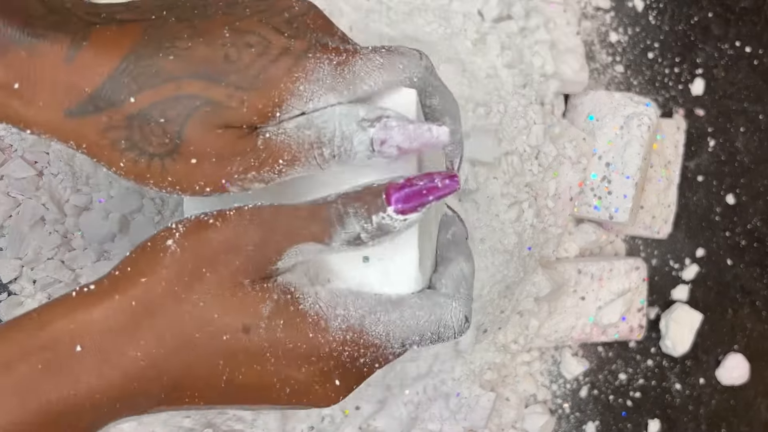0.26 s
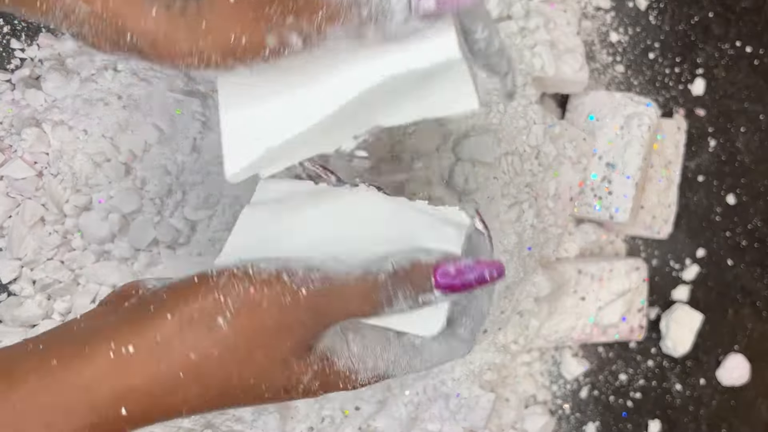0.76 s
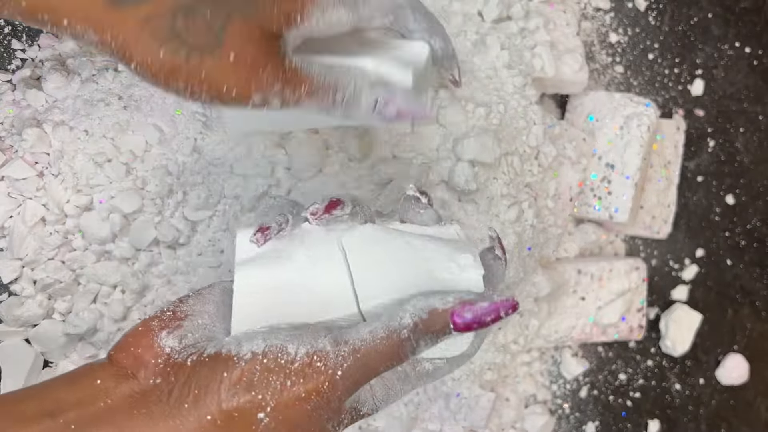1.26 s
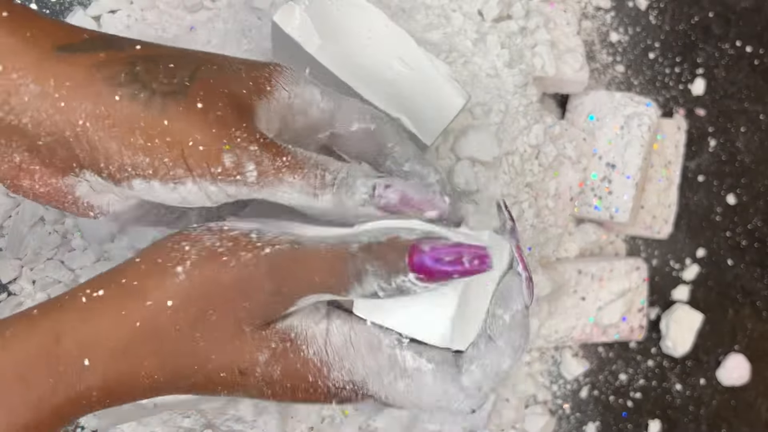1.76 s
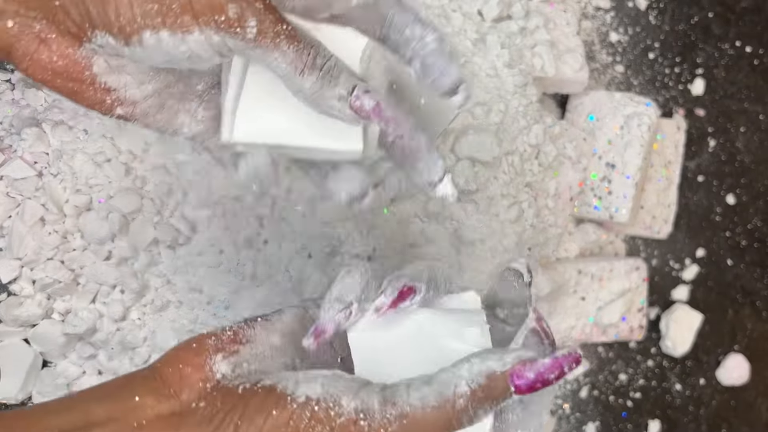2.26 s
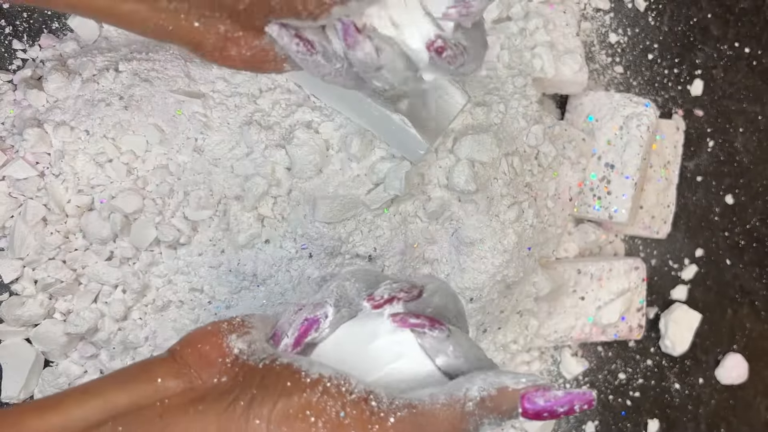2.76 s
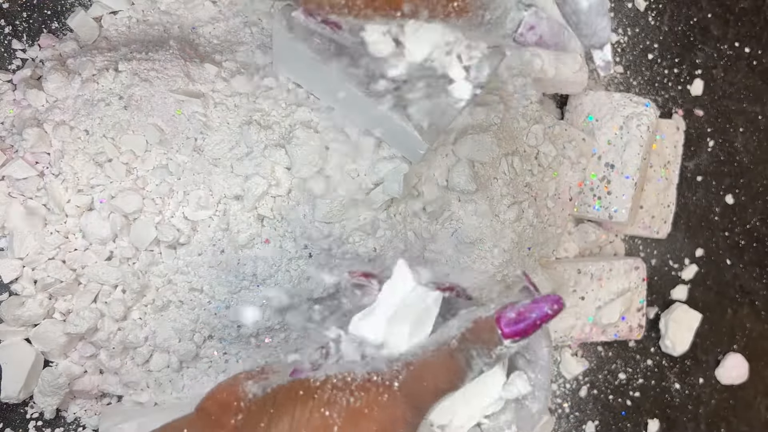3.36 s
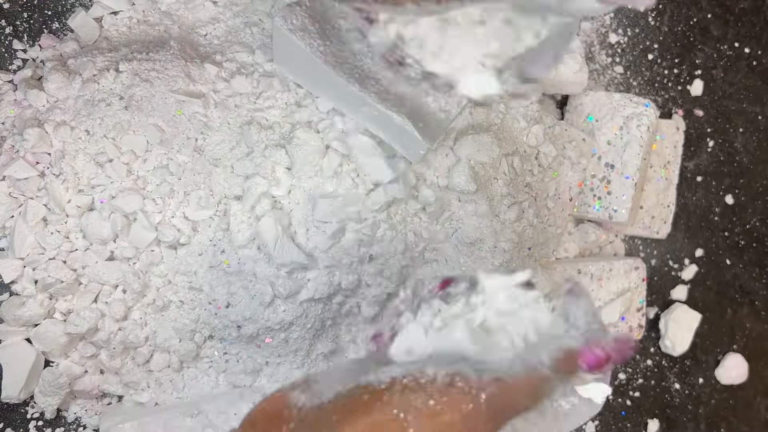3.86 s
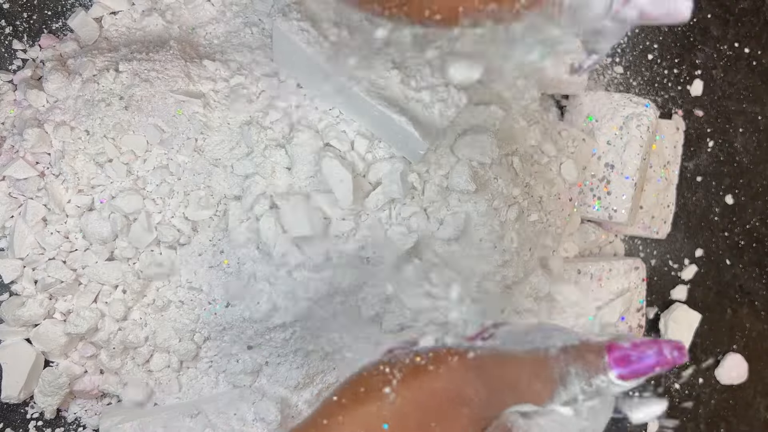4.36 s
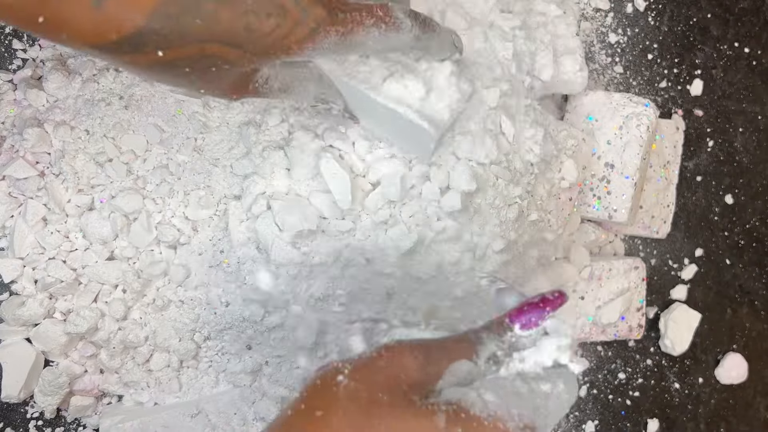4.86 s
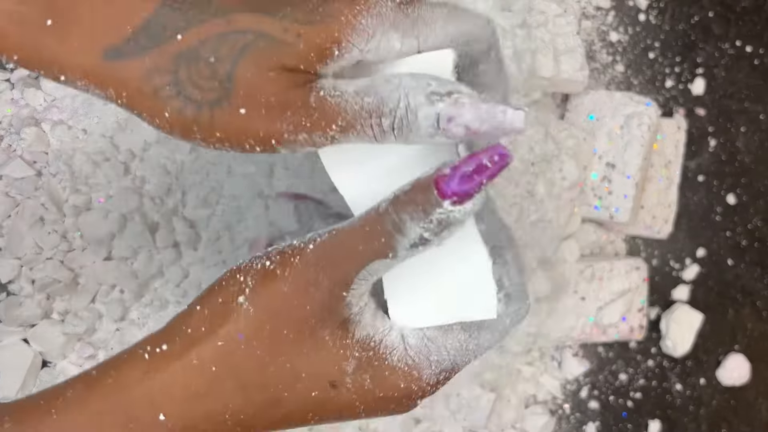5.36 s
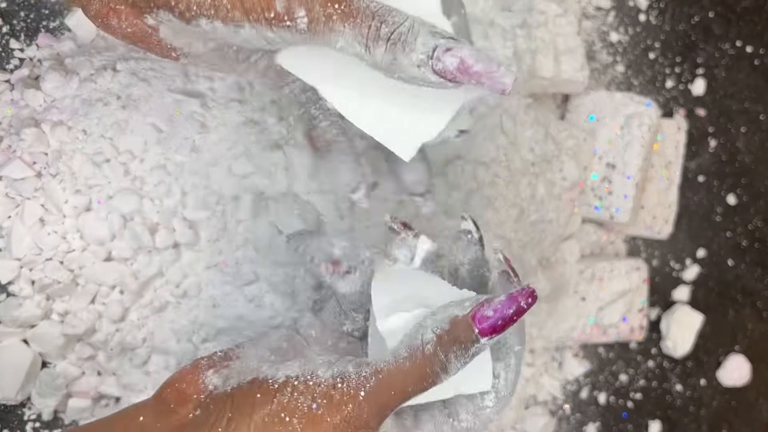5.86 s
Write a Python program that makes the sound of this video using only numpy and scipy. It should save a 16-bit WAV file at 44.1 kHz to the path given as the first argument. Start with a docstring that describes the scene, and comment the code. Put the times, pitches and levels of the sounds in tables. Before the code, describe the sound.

Brittle, dry chalk cracks and crumbles at close range, with crisp splintery ticks and powdery hiss. One hard break opens, quieter scraping follows, and heavy crushing builds halfway through before easing into irregular crackles and late snaps. The loudest breaks are slightly overloaded; a faint short room echo and a steady, dull fan hum surround them.

```python
"""Breaking dry chalk

Hands snap and crumble blocks of dry chalk at close range indoors. Each fracture is a decaying burst of noise
with a ringing splinter; the biggest add a low sliding push. Between them many tiny breaks gate a hiss of
crumbs, lumps and powder. A small room answers as decaying noise, a ventilation unit adds wavering tones and a
dull rush, and the loudest cracks are rounded off at full scale."""
import sys
import numpy as np
from scipy import signal
from scipy.fft import rfft, irfft, next_fast_len
from scipy.io import wavfile
from scipy.ndimage import uniform_filter1d

SR = 44100
rng = np.random.default_rng(int(sys.argv[2]) if len(sys.argv) > 2 else 0)


def to_wav(sig):
    """Store sig (one row per channel, or 1-D mono) as 16-bit WAV at the path in sys.argv[1].

    Samples outside -1..1 are clipped; the rate is SR.
    """
    pcm = np.clip(np.atleast_2d(sig), -1, 1) * 32767
    pcm = np.round(pcm).astype(np.int16)
    wavfile.write(sys.argv[1], SR, pcm.T)  # frames by channels


N = 269362

# noise spectra of lumps, crumbs and powder: f/Hz, relative density level/dB
COARSE = [(350, -50), (750, -0.5), (1000, -6), (1200, -4), (1700, -0.5), (2400, -1.5), (3000, -4.5),
          (4200, -34)]
CRUMB = [(1800, -77), (3200, 1.5), (4100, 1.5), (5000, 3.5), (6300, 1.5), (7400, -10.5), (9500, -10.5)]
POWDER = [(5500, -3), (7800, 1), (10000, -1.5), (11500, -8.5), (13500, -8.5), (15600, -13.5)]


def amp(db):
    """Level in dB to amplitude ratio: 20 dB per factor of ten."""
    return 10 ** (np.asarray(db) / 20)


def unit(x):
    """Normalisation by the mean square: x at rms 1."""
    return x / np.sqrt(np.mean(x ** 2) + 1e-20)


def along(points, hz):
    """Interpolation of (f/Hz, value) points on a logarithmic frequency axis; -120 below the first."""
    f, value = np.transpose(points)
    return np.interp(np.log(hz + 1), np.log(f + 1), value, left=-120, right=value[-1])


def filtered(x, response):
    """Linear filtering by multiplying the spectrum of x with a response of frequency."""
    size = next_fast_len(N + 8192)
    hz = np.fft.rfftfreq(size, 1 / SR)
    return irfft(rfft(x, size) * response(hz), size)[..., :N]


def noise(spectrum):
    """Spectral shaping of white noise: coloured noise of rms 1."""
    return unit(filtered(rng.standard_normal(N), lambda hz: amp(along(spectrum, hz))))


def place(s, rows):
    """Superposition: each row of samples is summed into the timeline from its start time."""
    first = np.round(np.asarray(s) * SR).astype(int)[:, None]
    at = first + np.arange(rows.shape[1])
    return np.bincount(at.ravel(), rows.ravel(), N + rows.shape[1])[:N]


def cracks(small_fractures):
    """Impulsive energy release: a fracture front sprays broad noise, knocks the block and rings one splinter."""
    # the clear fractures: t/s, strength/dB, brightness (powder over lumps)/dB, splinter f/Hz, decay scale t60/s
    clear_fractures = [(.049, -5, 0, 8200, 0.015), (.08, -12, 2, 3970, .02),
                       (.0968, 10.5, 4.5, 5840, 0.016), (.2455, -1.5, 4, 5630, 0.022),
                       (.346, -17, 8, 3050, 0.017), (.357, -19, 22, 7050, 0.017),
                       (.407, -20, 18, 7600, .02), (.4329, -13.5, 12, 1740, 0.039),
                       (.465, -7.5, 2, 6640, 0.055), (.4834, 21.5, -2, 1760, 0.024),
                       (.498, -11, -15, 1870, .017), (.5104, 1.5, -10, 3650, 0.023),
                       (.5442, 13, -4, 1890, 0.024), (.566, 7.5, -4, 1780, .02),
                       (.7536, -15, 7, 5770, .031), (1.0011, -2, 4, 2320, 0.017),
                       (1.0226, -7, -2, 2360, 0.03), (1.1702, -16, -11, 1540, .02),
                       (1.3717, -6.5, 1, 6070, 0.032), (1.407, -9.5, -13, 3230, 0.035),
                       (1.4698, -18.5, 19, 7700, .022), (1.7549, -7, -1, 2220, 0.022),
                       (1.7779, -7, -6, 1600, 0.025), (1.8001, -5, 5, 6270, 0.047),
                       (1.8685, -19, -13, 1430, 0.017), (2.1181, -6.5, 24.5, 9300, 0.022),
                       (2.2334, -7, 12, 9500, 0.034), (2.2998, -16, 15, 2410, .032),
                       (2.381, 11.5, -1, 2900, 0.025), (2.43, -13, 7, 2440, .024),
                       (2.4842, 12, -7.5, 1620, 0.023), (2.489, 2, -5, 1400, .022),
                       (2.531, 6, -2, 7040, 0.017), (2.546, -1, -11, 2560, 0.018),
                       (2.605, 5, -1, 4730, 0.019), (2.6244, 11.5, 0, 3050, 0.024),
                       (2.6498, 3, 9, 6400, .018), (2.662, 3, -5, 2480, .02), (2.6705, 6, 10, 2500, 0.014),
                       (2.6777, 12, -8, 2370, 0.024), (2.6924, 15.5, 1, 2290, 0.018),
                       (2.7091, 3, -16, 1680, 0.02), (2.7317, -8, -1, 2510, .024),
                       (2.7455, 2.5, -13, 2360, 0.031), (2.85, 4, 6, 1650, .013),
                       (2.8615, -1, 0, 7340, .026), (2.869, 13.5, -5.5, 2560, 0.029),
                       (2.875, 4, -7, 5550, 0.019), (2.8962, 3, -4, 3080, 0.022),
                       (2.922, -5, -10, 2500, .022), (3.006, -12.5, 0, 2500, .015),
                       (3.0628, 4.5, -5, 2500, 0.016), (3.157, -0.5, 0, 2330, 0.019),
                       (3.1916, 3, -7, 2580, 0.031), (3.24, 6, 3, 2350, 0.018),
                       (3.2768, -1.5, -12, 1770, 0.029), (3.2918, 15, -16.5, 976, 0.026),
                       (3.305, 0, -13, 1000, .025), (3.319, -1, -33, 1690, 0.019),
                       (3.3578, 1.5, -2, 1650, .021), (3.39, 1.5, 3, 5700, 0.017),
                       (3.4284, -3, -5, 2310, 0.028), (3.456, -4.5, 14, 9800, .025),
                       (3.5922, -4, -20, 2270, 0.021), (3.6192, -4, -1, 4240, 0.034),
                       (3.6627, 2, -5, 5740, 0.013), (3.7113, -5, -4, 1570, 0.018),
                       (3.7706, -5, -5, 1770, 0.02), (3.7991, -1, -14, 1540, .026),
                       (3.818, -5.5, 21, 9300, 0.026), (3.9177, -8, -2, 2380, 0.02),
                       (4.0074, -4, 2, 9250, 0.044), (4.0622, -7, 4, 5860, .021),
                       (4.0911, -6, 16, 1670, 0.02), (4.1713, -7, -15, 5850, 0.017),
                       (4.2046, -8, 21, 5000, 0.021), (4.2228, -1, -3, 4900, .024),
                       (4.2856, -2, -15, 1630, 0.023), (4.3056, -3, -4, 3850, 0.026),
                       (4.329, 0, 1, 1600, 0.022), (4.3501, -4.5, 12, 1580, .021),
                       (4.3874, -12, -2, 1520, .022), (4.4412, 0.5, 1, 5700, 0.033),
                       (4.449, 4.5, -4, 3200, 0.036), (4.47, -4, 6, 3870, 0.019),
                       (4.5266, -8, 3, 5740, 0.022), (4.584, -2.5, 9, 5840, 0.018),
                       (4.7457, -4, -18, 2540, 0.021), (4.785, 5.5, -2, 2420, 0.012),
                       (4.8294, -8.5, 21.5, 7270, 0.021), (4.9163, -7, 11, 2430, .015),
                       (4.9282, 2, 15, 8460, .013), (4.947, -6, -8, 2470, .024),
                       (5.3929, -4, -1, 5100, 0.017), (5.472, -2, -1, 2250, 0.035),
                       (5.4983, 10.5, -1.5, 2210, 0.029), (5.6164, -11, 17, 4840, .022),
                       (5.69, -15, -17, 2170, 0.019), (5.8166, -12, -1, 4800, .022),
                       (5.8825, -7, 10, 6200, .031), (5.9973, -11, 19, 1330, 0.024),
                       (6.0561, -6.5, 9, 5750, 0.041), (6.101, 11, -6, 2410, 0.029)]
    rows = np.vstack([clear_fractures, small_fractures])
    s, db, bright_db, hz, t60 = rows.T[:, :, None]
    start = s[:, 0]
    t = np.arange(SR // 24) / SR
    rise_s = 0.00051 * amp(-.6 * db)  # weak breaks tear slowly, strong ones snap
    t60 = np.clip(t60, .004, .1)

    def fade(share):
        """Exponential decay after a finite rise; share scales the 60 dB decay time."""
        return amp(db - 60 * t / (share * t60)) * (1 - np.exp(-t / rise_s))

    body = place(start, amp(-13.0) * fade(1.1)) * noise(CRUMB)
    knock = place(start, amp(-11.5 - bright_db / 2) * fade(0.63)) * noise(COARSE)
    spray = place(start, amp(-13.5 + bright_db / 2) * fade(0.9)) * noise(POWDER)
    # porous chalk holds no clean pitch: the phase takes a random walk, 0.025 rad rms per sample
    drift = 0.025 * np.cumsum(rng.standard_normal((len(s), len(t))), axis=1)
    tone = np.sin(2 * np.pi * hz * t + drift)
    # hard breaks are noisier: the ring loses 0.21 dB per dB of strength
    ring = place(start, amp(-9 - 0.21 * db) * fade(0.88) * tone)
    return body + knock + spray + ring


def crackle(crumbs):
    """Random point process: small chance fractures, with strength following the grinding up to a ceiling."""
    # recurring pitches at which the small breaks ring, as the cupped hands resonate: f/Hz
    splinter_hz = (1530, 2370, 5000, 5840, 9680)
    above_grinding_db, ceiling_db, scatter_db = 19, -15.5, 2
    when, weakness, brightness, pitch, detune = rng.random((300, 5)).T
    db = 20 * np.log10(crumbs[(when * N).astype(int)]) + above_grinding_db
    db = np.minimum(db, ceiling_db) + scatter_db * np.log(weakness + 1e-9)
    bright_db = 30 * (brightness - .5)
    hz = np.take(splinter_hz, (pitch * len(splinter_hz)).astype(int))
    hz = hz * (1 + 0.11 * (detune - .5))
    t60 = np.full(len(hz), .018)
    return np.transpose([when * N / SR, db, bright_db, hz, t60])


def thumps():
    """Damped oscillation: a big break gives a low push that slides down in pitch as the halves part."""
    # jolts of the block against the palms: t/s, initial level/dB, final f/Hz, t60/s
    jolts = np.array([(0.482, 7, 260, 0.039), (0.547, -13, 132, 0.12), (0.566, -12, 600, 0.03),
                      (1.407, -19, 750, 0.036), (1.869, -17, 805, 0.039), (2.867, -7.5, 165, 0.068),
                      (3.292, -6, 330, 0.05), (4.285, -13, 406, 0.075), (5.496, -14.5, 364, 0.028),
                      (6.1, -11, 460, 0.065)])
    s, db, hz, t60 = jolts.T[:, :, None]
    t = np.arange(SR // 8) / SR
    turns = hz * (t + 0.0035 * (1 - np.exp(-t / 0.0019)))  # starts at 2.8 times the final pitch
    decay = amp(db - 60 * t / np.clip(t60, .005, .2))
    return place(s[:, 0], decay * np.sin(2 * np.pi * turns))


def pressure():
    """Power addition: rubs that swell, hold and ease over a faint trickle set crumb, lump and powder gains."""
    # squeezes and rubs of the palms: t of full pressure/s, swell/s, hold/s, crumb level/dB, brightness/dB
    rubs = np.array([(0.0, .1, .07, -36, 3), (0.11, 0.025, 0.042, -34, 2), (0.25, 0.045, .02, -41, 4),
                     (0.35, .05, 0.036, -48, 3), (0.49, 0.018, 0.037, -18, -10.5),
                     (0.6, 0.063, 0.021, -31.5, -9), (0.76, 0.061, 0.11, -33, 5.5),
                     (1.009, 0.087, 0.01, -31.5, 4), (1.25, 0.15, 0.012, -36.5, 9),
                     (1.36, 0.044, 0.0085, -32.5, 0), (1.6, 0.18, 0.026, -38.5, 6),
                     (1.7, 0.045, 0.0082, -34, 0), (1.75, 0.08, .02, -40, 5), (1.81, .1, 0.0059, -28, 4),
                     (1.9, 0.045, .03, -41.5, 11), (2.018, 0.092, 0.0067, -30.5, 9),
                     (2.14, 0.03, 0.079, -36, 10), (2.23, 0.14, 0.0061, -38, 8),
                     (2.39, 0.046, 0.019, -25.5, -3), (2.52, 0.097, .02, -28.5, -12),
                     (2.69, 0.077, 0.0069, -16.5, -8.5), (2.75, .05, .01, -24, -6),
                     (2.87, 0.064, .02, -24.5, -5), (3.12, 0.089, .03, -30, -9),
                     (3.2, 0.065, 0.085, -23, -8.5), (3.3, .06, 0.039, -20, -3.5),
                     (3.42, 0.11, 0.048, -25, -2.5), (3.6, 0.21, 0.043, -28.5, -5),
                     (3.72, 0.12, 0.046, -34.5, -4), (3.85, 0.073, 0.21, -34, -6), (4.0, .1, .2, -27.5, -4),
                     (4.27, 0.21, 0.12, -26.5, -3), (4.45, 0.038, .05, -40, -1),
                     (4.59, .15, 0.077, -27.5, -1), (4.74, 0.26, 0.035, -28, -6),
                     (4.85, .1, 0.03, -33.5, -7), (4.96, 0.11, 0.018, -32, 0),
                     (5.12, 0.22, 0.053, -30.5, 3.5), (5.288, 0.025, 0.0041, -26.5, 3.5),
                     (5.37, 0.047, 0.027, -33, -6), (5.5, 0.069, 0.027, -30, 2),
                     (5.729, 0.095, 0.077, -32.5, 2.5), (5.88, 0.029, 0.0079, -32, 6),
                     (6.0, 0.069, 0.009, -32, 1), (6.055, 0.027, .01, -32, 13)])
    # crumbs, lumps and powder that keep falling between rubs: level/dB
    trickle_db = (-44.5, -42.5, -50)
    swell_db, ease_db_per_s = 16, 153  # rise over the swell time, fall after the hold
    t = np.arange(0, N / SR, .002)
    s, swell, held, db, bright_db = rubs.T[:, :, None]
    early = np.maximum(s - t, 0) / np.maximum(swell, .01)  # in swell times
    late = np.maximum(t - s - held, 0)
    crumbs_db = db - swell_db * early - ease_db_per_s * late
    lumps_db = crumbs_db - 2 - bright_db / 2
    powder_db = crumbs_db - 0.5 + bright_db / 2
    gains = []
    for layer_db, low_db in zip((crumbs_db, lumps_db, powder_db), trickle_db):
        power = np.sum(amp(layer_db) ** 2, axis=0) + amp(low_db) ** 2
        gains.append(np.interp(np.arange(N) / SR, t, np.sqrt(power)))
    return gains


def patchy(x, depth_db):
    """Time-varying filtering: narrow colours come and go in tens of ms, as cupped hands and loose lumps shift."""
    z = signal.stft(x, nperseg=256)[2]
    field = uniform_filter1d(rng.standard_normal(z.shape), size=3, axis=0)  # smooth across frequency
    field = uniform_filter1d(field, size=9, axis=1)  # smooth along time
    return unit(signal.istft(z * amp(depth_db * unit(field)), nperseg=256)[1][:N])


def grinding(crumbs, lumps, powder):
    """Amplitude modulation: thousands of unequal tiny breaks gate the rubbing hiss and ring as short ticks."""
    draw = rng.random((3200, 7))
    when = draw[:, 0] * N / SR
    size = amp(np.minimum(-4.5 * np.log(1 - draw[:, 1:2]), 16))  # many small, few large
    t = np.arange(SR // 40) / SR
    shape = amp(-60 * t / 0.007) * (1 - np.exp(-t / 0.00015))
    grit = np.clip(lumps / amp(-34), .35, 1.2)  # a light rub is smooth, a crush is grainy

    def gate(k):
        """Grain statistics: each break reaches this layer up to 16 dB weaker, by draw column k."""
        bursts = unit(place(when, size * amp(-16 * draw[:, k:k + 1]) * shape))
        return unit(1.25 + grit * bursts)

    hiss = 0
    for level, colour, k in ((crumbs, CRUMB, 4), (lumps, COARSE, 5), (powder, POWDER, 6)):
        hiss = hiss + level * gate(k) * patchy(noise(colour), depth_db=3.0)
    hz = 1500 * 7 ** draw[:, 2:3]
    cycles = 10 + 120 * draw[:, 3:4] ** 3  # cycles per 60 dB of decay
    ring = amp(-60 * t * hz / cycles) * np.sin(2 * np.pi * hz * t)
    ticks = unit(place(when, size * ring))
    return amp(-2.22) * hiss + amp(-10.0) * crumbs * ticks


def room(x):
    """Reverberation: convolution with noise in which each frequency decays at its own speed."""
    # reverberation time of the room: f/Hz, t60/s
    reverberation = [(300, 0.69), (2000, 0.3), (6000, 0.24), (14000, 0.11)]
    hz, t, z = signal.stft(rng.standard_normal(SR // 2), SR, nperseg=256)
    t60 = np.clip(along(reverberation, np.maximum(hz, reverberation[0][0] + 1)), .02, 1)
    tail = signal.istft(z * amp(-60 * t / t60[:, None]), SR, nperseg=256)[1]
    delayed = np.pad(x, (130, 0))  # 3 ms before the first answer
    return signal.fftconvolve(delayed, tail / np.linalg.norm(tail))[:N]


def ventilation():
    """Narrow-band and broad-band noise: slightly unsteady tones over a dull rush of air."""
    # fan and motor tones: f/Hz, halo half-width/Hz, rms level/dB
    hum = [(27.7, 13, -34.5), (59.2, 8, -38), (120, 3.2, -26.5), (177, 3, -41), (218.4, 6, -34),
           (238, 3.5, -40), (280, 4, -41), (328, 6, -38.5), (351, 5, -35.5), (393.7, 2, -30), (438, 4, -42),
           (473.7, 2.5, -40.5), (507.5, 5, -46)]
    # spectrum of the air rush: f/Hz, relative density level/dB
    air = [(7.1, -35), (12, 5), (69, -2), (121, -2.5), (171, -6), (220, -5.5), (271, -4), (384, -3),
           (624, -16.5), (700, -13.5), (990, -22), (1610, -27), (3000, -70), (3900, -57), (6600, -120)]
    t = np.arange(N) / SR
    total = amp(-25) * noise(air)
    for hz, width_hz, db in hum:
        # a steady core plus narrow noise around it makes the tone waver
        halo = unit(filtered(rng.standard_normal(N), lambda f: 1 / (1 + ((f - hz) / width_hz) ** 4)))
        core = np.sqrt(2) * np.sin(2 * np.pi * (hz * t + rng.random()))
        total += amp(db) * unit(core + 0.19 * halo)
    return total


def scene():
    """Superposition of the chalk, its room answer and the ventilation."""
    crumbs, lumps, powder = pressure()
    chalk = cracks(crackle(crumbs)) + thumps() + grinding(crumbs, lumps, powder)
    return (chalk + amp(-16.5) * room(chalk) + ventilation())[None]


def record(dry):
    """Saturation and band limiting: peaks near full scale are rounded off, then the top is cut."""
    top_hz = 15650
    clipped = dry / (1 + np.abs(dry) ** 8) ** (1 / 8)
    return filtered(clipped, lambda hz: hz < top_hz)


dry = scene()
out = record(dry)
to_wav(out)
```